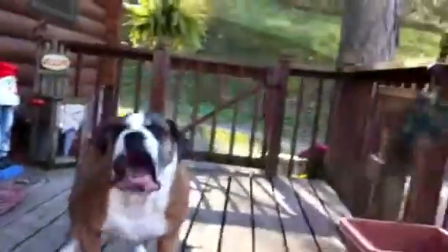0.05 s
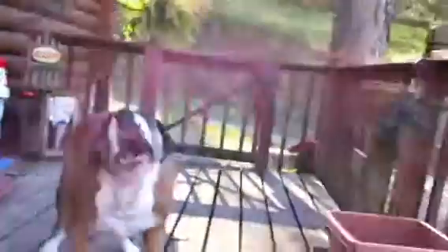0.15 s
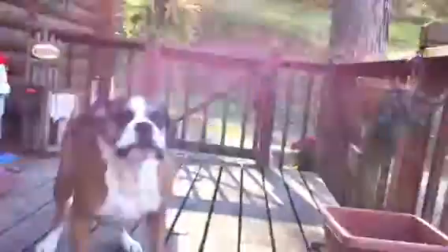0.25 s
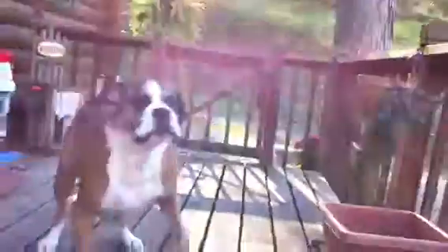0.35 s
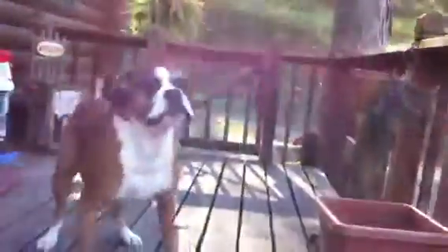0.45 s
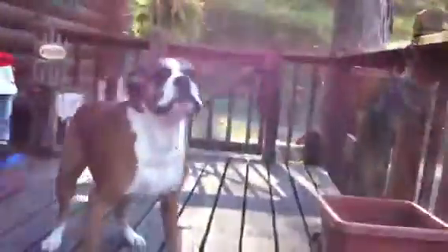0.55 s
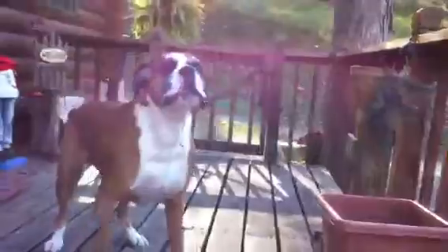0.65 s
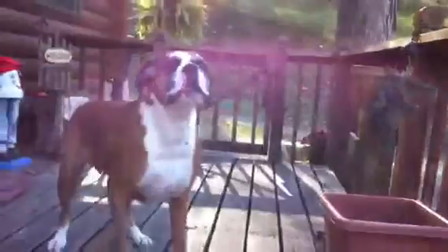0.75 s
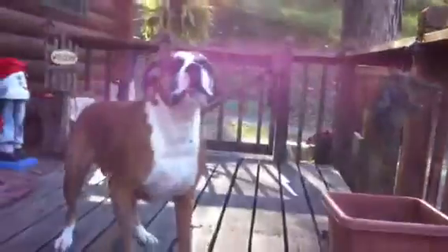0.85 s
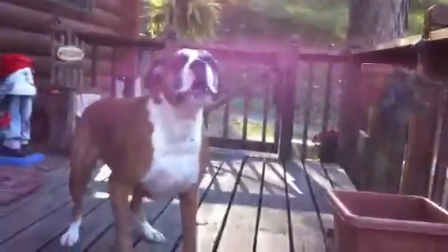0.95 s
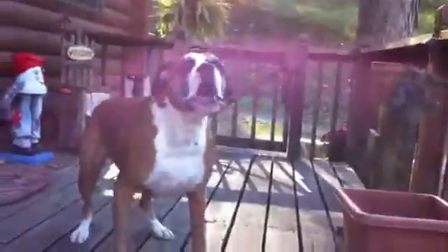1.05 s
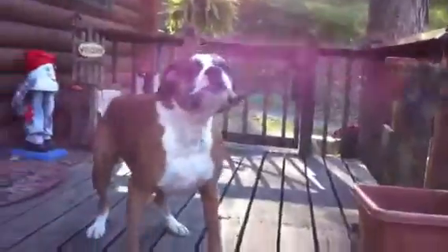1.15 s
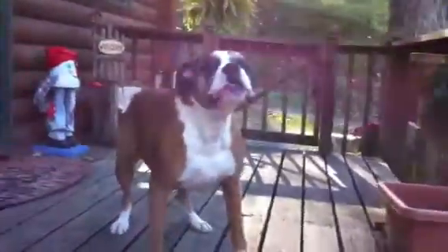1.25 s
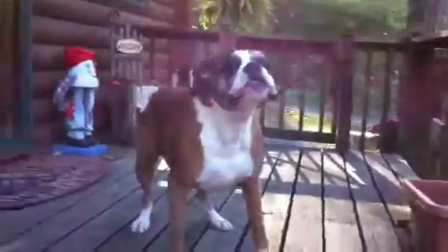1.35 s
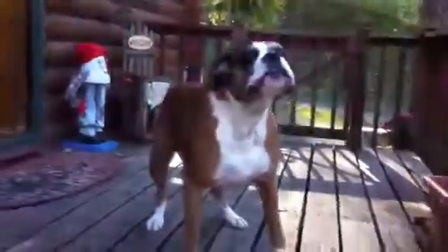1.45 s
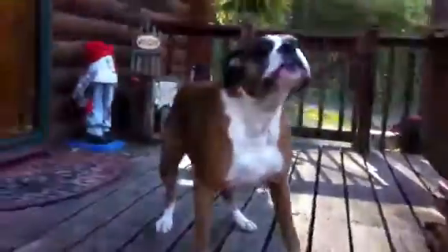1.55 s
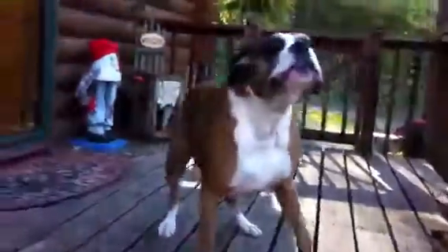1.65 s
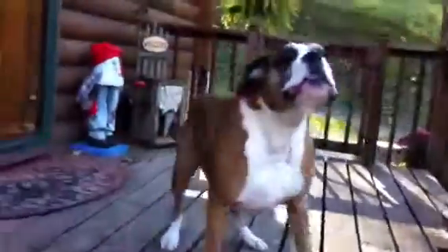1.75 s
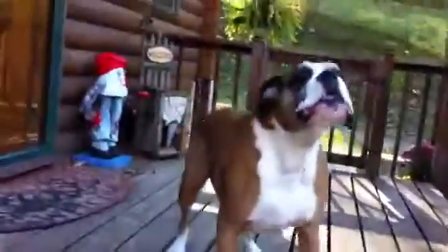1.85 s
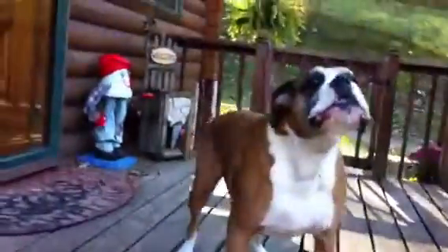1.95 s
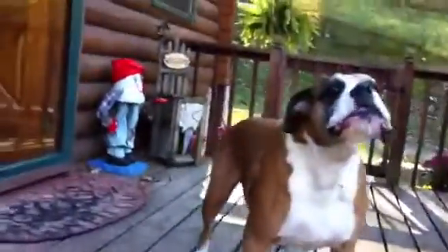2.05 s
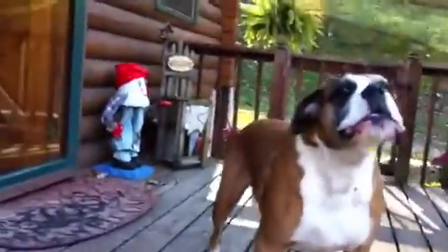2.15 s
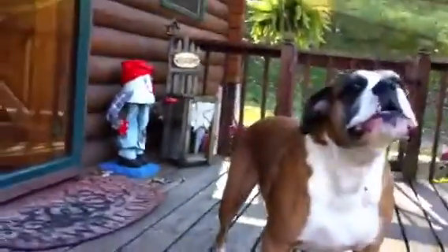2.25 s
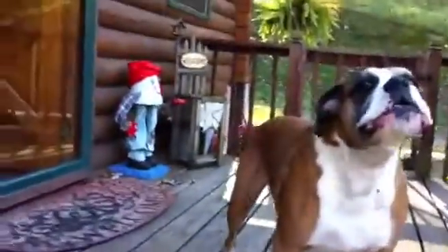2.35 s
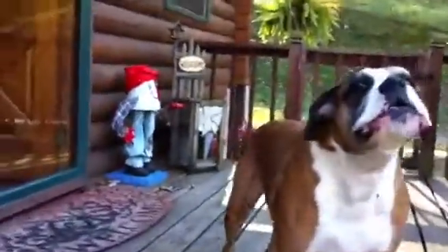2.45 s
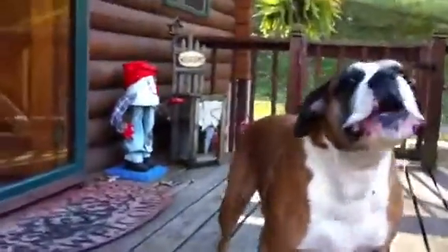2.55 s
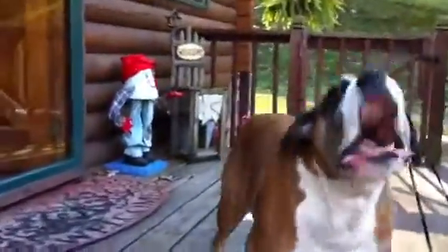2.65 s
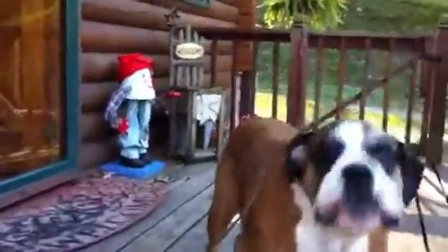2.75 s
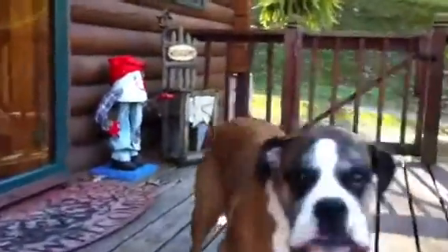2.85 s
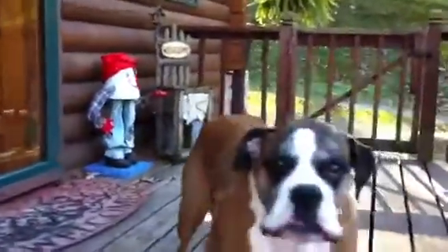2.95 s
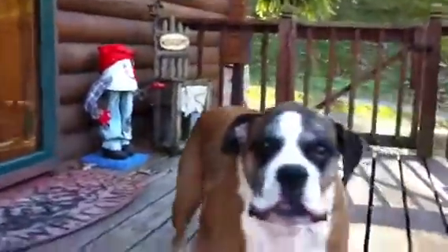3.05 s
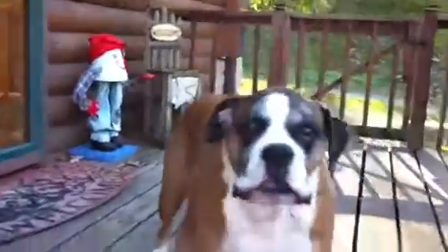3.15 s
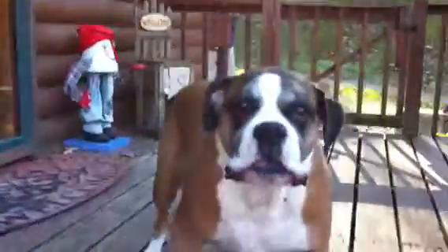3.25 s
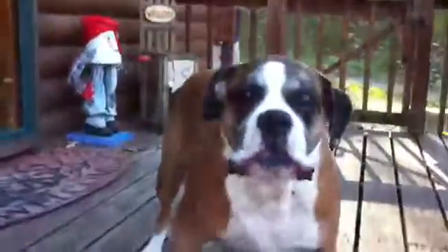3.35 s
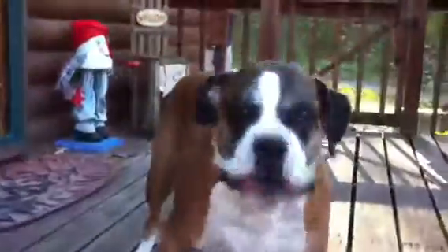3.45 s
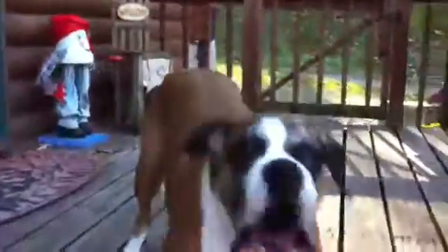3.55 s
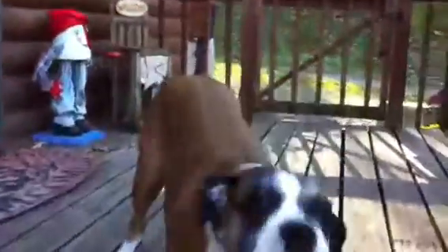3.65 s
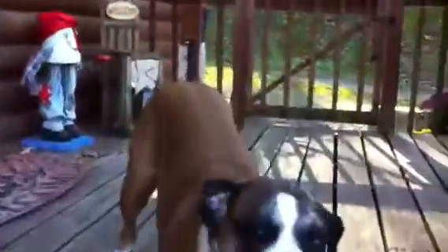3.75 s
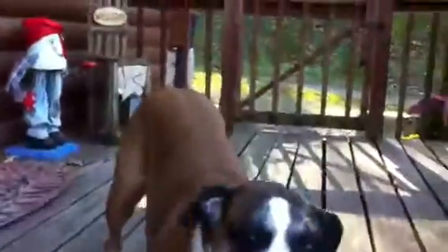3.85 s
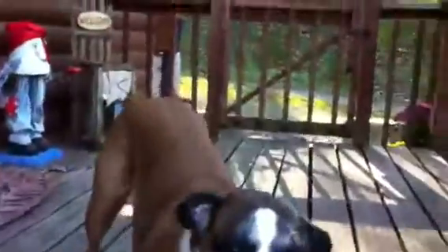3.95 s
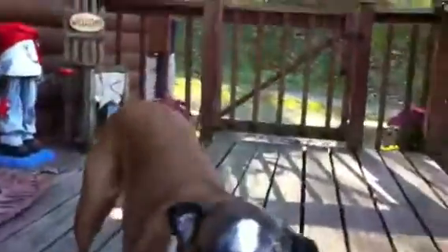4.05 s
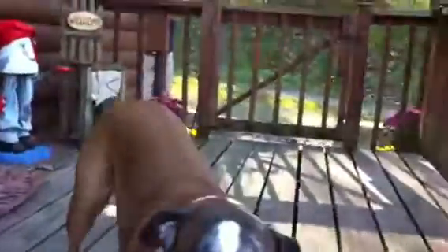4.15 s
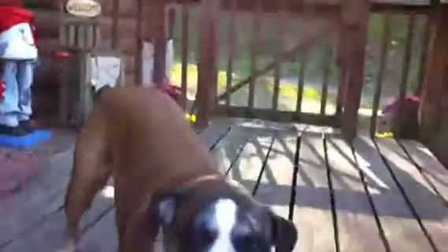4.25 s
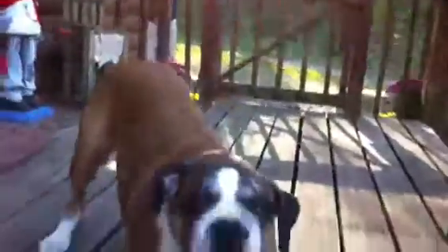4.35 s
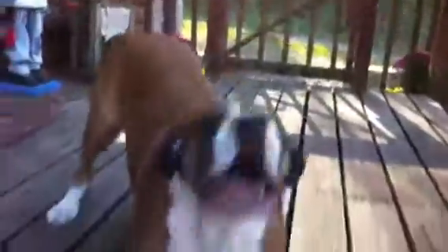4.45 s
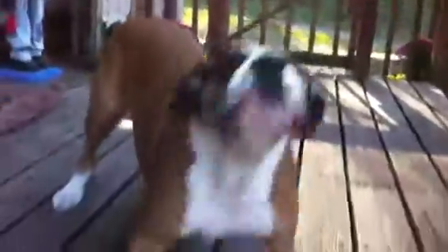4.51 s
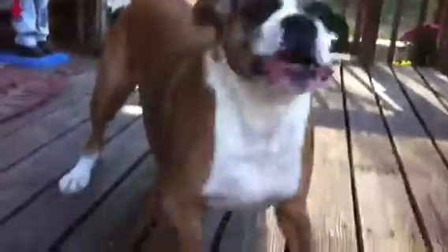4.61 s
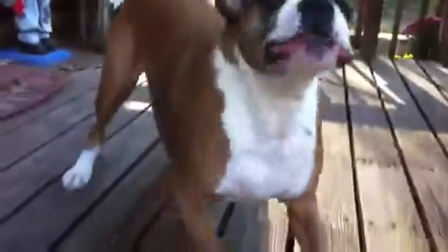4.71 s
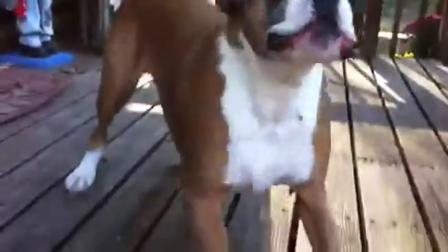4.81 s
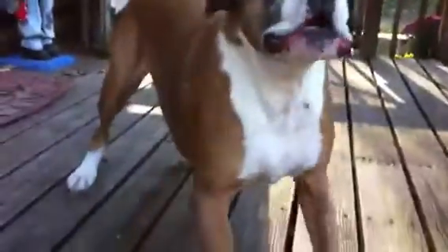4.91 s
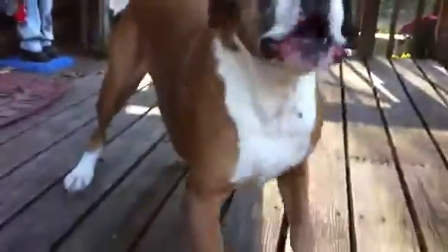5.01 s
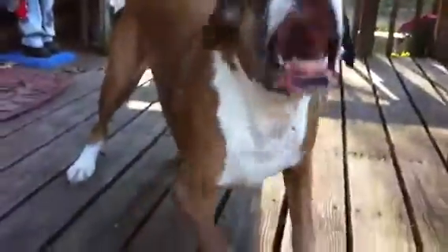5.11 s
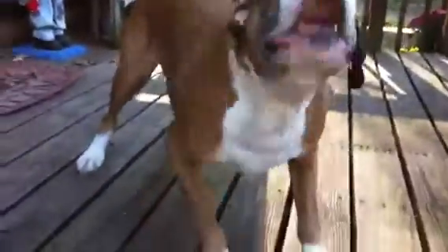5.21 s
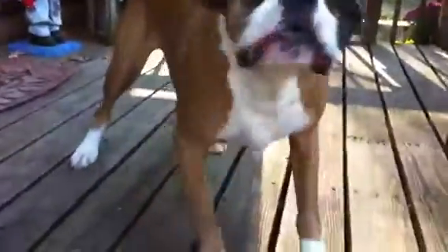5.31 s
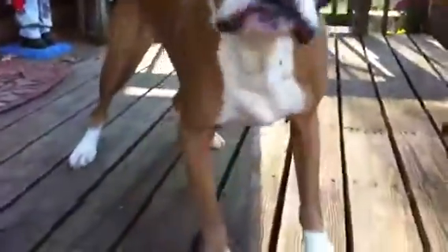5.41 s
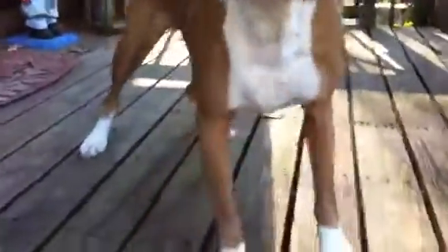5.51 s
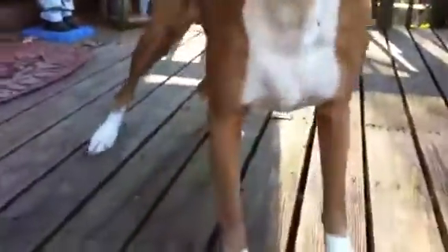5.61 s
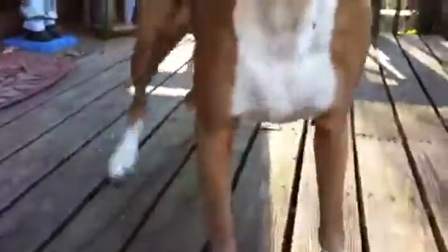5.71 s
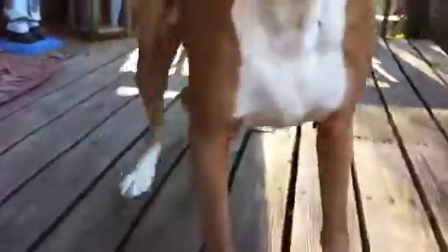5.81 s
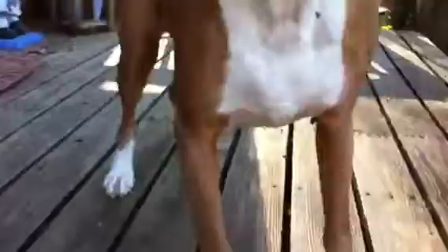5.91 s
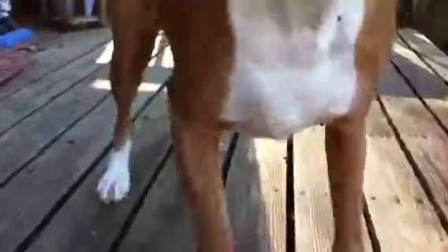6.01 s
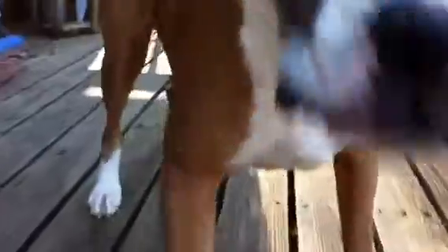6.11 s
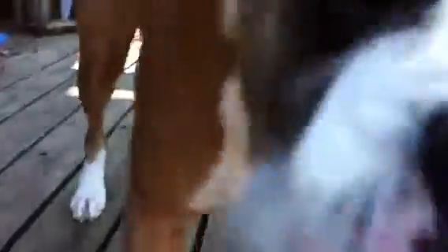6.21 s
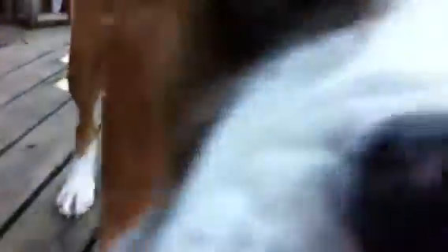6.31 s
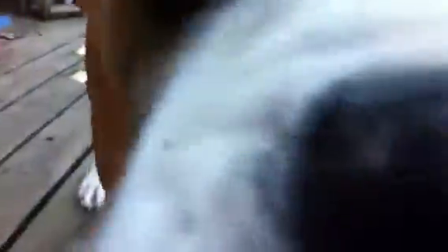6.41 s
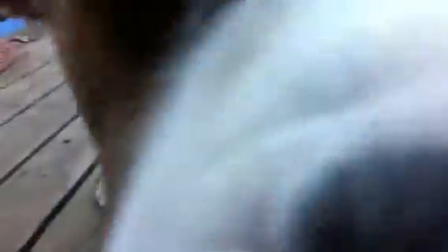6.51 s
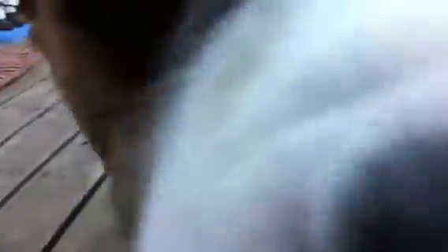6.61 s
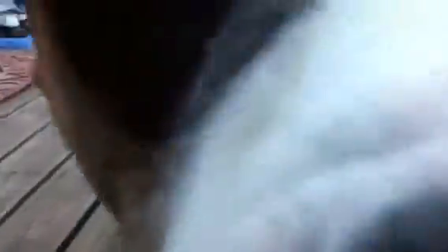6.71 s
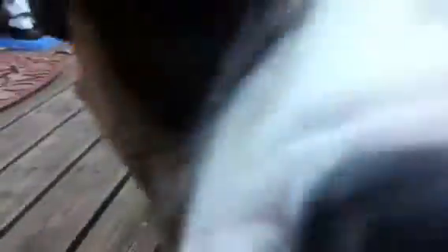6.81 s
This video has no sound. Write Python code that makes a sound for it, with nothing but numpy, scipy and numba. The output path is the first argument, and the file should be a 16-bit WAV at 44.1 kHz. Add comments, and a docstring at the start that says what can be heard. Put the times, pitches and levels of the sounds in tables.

```python
"""A short rattling growl, then five single barks: a dog on a wooden deck, a step from the microphone.
Vocal folds buzz through throat, mouth and teeth resonances. Each bark arches up and down in pitch
and breaks between clean and hoarse; the jaw moves the lowest throat resonance.
In between the dog pants with a low rumble, smacks its lips, clicks its claws and at last sniffs up close.
Faint outdoor air lies underneath."""
import sys
import numpy as np
from scipy import signal
from scipy.fft import rfft, irfft
from scipy.io import wavfile
from scipy.ndimage import uniform_filter1d, minimum_filter1d
from numba import njit

SR = 44100
rng = np.random.default_rng(int(sys.argv[2]) if len(sys.argv) > 2 else 0)


def transcribe(u):
    """Save the signal u as a 16-bit wav file named by the first command-line argument.

    u: samples, shape (n,) or (channels, n), limited to [-1, 1]; the rate is SR.
    q: integer samples, one column per channel.
    """
    v = np.clip(np.atleast_2d(u).T, -1, 1)
    q = np.round(v * 32767).astype(np.int16)
    wavfile.write(sys.argv[1], SR, q)


N = 302967
T = np.arange(N) / SR
TOP_HZ = 15950


def barks():
    """Five barks: bright, fast-jittering folds; the throat level dips where the voice breaks."""
    # start/s, pitch rise/s, pitch fall/s, crest f/Hz, attack/s, hold/s, mouth/dB, mouth sag/(dB/s),
    # hiss/dB, upper and lower throat resonance/Hz, opening and crest roughness/0-1, rasp re folds
    gestures = [(.205, .100, 0.078, 593, 0.025, 0.12, -29.5, 1, -35, 794, 605, 0.53, 0.6, 3),
                (2.689, 0.11, 0.11, 606.2, 0.055, 0.098, -20.5, 31, -32, 885, 509, .4, 0.6, .35),
                (3.632, 0.089, 0.12, 512.5, 0.034, 0.11, -25, 3.5, -31, 824, 576, 0.5, 0.67, 0.59),
                (4.506, 0.11, .080, 510, 0.031, 0.11, -17.5, 42, -30, 752, 756, 0.94, 0.03, 0.16),
                (5.243, .105, .078, 548.6, 0.0085, .124, -22, 65.5, -35.5, 790, 573, .7, .58, 1.1)]
    # throat level, one list per bark: t/s, level/dB
    throat_levels = [
        [(0.205, -45.5), (0.217, -23.5), (0.239, -5.5), (0.263, -26), (0.315, -9), (0.335, -31), (0.351, -16),
         (0.365, -36), (0.41, -48.5)],
        [(2.688, -40.5), (2.696, -32), (2.742, -7.5), (2.758, -19.5), (2.774, -6.5), (2.784, -20), (2.846, -4),
         (2.9, -48.5)],
        [(3.636, -39), (3.654, -19), (3.678, 0.5), (3.696, -22), (3.744, -9.5), (3.77, -27.5), (3.786, -14.5),
         (3.814, -43.5), (3.84, -52)],
        [(4.505, -12), (4.511, -39), (4.537, -11), (4.567, -10.5), (4.605, -24.5), (4.671, -22.5), (4.687, -80),
         (4.7, -53)],
        [(5.245, -31), (5.255, -15.5), (5.269, -8), (5.299, -16), (5.309, -30.5), (5.361, -11), (5.407, -38),
         (5.42, -50)],
    ]
    out = np.zeros(N)
    for (start_s, *shape, rasp), levels in zip(gestures, throat_levels):
        sound = voice(bark_controls(levels, start_s, *shape), rasp, jitter=.065, jitter_hz=380,
                      subharmonic=1.1, leak=1.1, tilt=.45, jaw_width_hz=200, low_hz=370, steady_s=.005)
        add(out, start_s, sound)
    return out


def bark_controls(levels, start_s, rise_s, fall_s, crest_hz, attack_s, hold_s, mouth_db, sag_db_per_s,
                  hiss_db, upper_hz, lower_hz, rough_open, rough_crest):
    """Pitch arches; harmonic 2 locks near the upper throat resonance, harmonic 1 near the lower."""
    rest_hz, jaw_shut_hz, release_s, tail_s = 295.8, 450, .026, .05
    lower_reach_hz, upper_reach_hz = 55.5, 85
    knots_s = np.cumsum([0, attack_s, hold_s, release_s, tail_s])
    t = T[:int(knots_s[-1] * SR)]
    throat_db = np.interp(start_s + t, *np.transpose(levels))
    effort_db = np.interp(t, knots_s, [-21, 0, 0, -20, -35])
    progress = np.interp(t, [0, rise_s, rise_s + fall_s], [0, 1, 2])
    arch = np.sin(np.pi / 2 * progress) ** 2
    hz = rest_hz + (crest_hz - rest_hz) * arch
    lower_lock = 1 / (1 + ((hz - lower_hz) / lower_reach_hz) ** 2)
    upper_lock = 1 / (1 + ((2 * hz - upper_hz) / upper_reach_hz) ** 2)
    register = lower_lock / (lower_lock + upper_lock)
    # the upper lock holds the pitch back and cleans the voice; between locks it breaks hoarse
    hz += .5 * upper_lock * (upper_hz / 2 - hz)
    rough = rough_open + (rough_crest - rough_open) * arch
    rough *= 1 - .55 * upper_lock + .15 * np.sin(np.pi * register) ** 2
    open_hz = upper_hz + (lower_hz - upper_hz) * register
    jaw_hz = jaw_shut_hz + (open_hz - jaw_shut_hz) * np.interp(t, knots_s, [.3, 1, 1, 0, 0])
    lock_lift_db = 4.5 * (np.maximum(upper_lock, lower_lock) - .5)
    mouth_rel_db = effort_db + mouth_db - sag_db_per_s * t + lock_lift_db - throat_db
    jowl_flap_db = 3 * wander(t, 83)
    hiss_rel_db = effort_db + hiss_db - 7.5 * (1 - np.minimum(progress, 1)) + jowl_flap_db - throat_db
    return start_s + t, hz, rough, jaw_hz, throat_db, mouth_rel_db, hiss_rel_db


def growl():
    """Slow, rough folds rattle; as the growl runs out, the pitch sags and the jaw closes."""
    # throat level: t/s, level/dB
    throat_levels = [(0.0, -15), (0.012, -14.5), (0.034, -20), (0.046, -21), (0.084, -29), (0.116, -43.5),
                     (0.137, -43.5)]
    s, db = np.transpose(throat_levels)
    hz, jaw_hz = 85.1 - 120 * s, 620 - 3400 * s
    rough, mouth_rel_db, hiss_rel_db = .97, -23, -28
    sound = voice((s, hz, rough, jaw_hz, db, mouth_rel_db, hiss_rel_db), rasp=2, jitter=.12,
                  jitter_hz=110, subharmonic=.25, leak=2.4, tilt=.8, jaw_width_hz=190, low_hz=120,
                  steady_s=.008)
    return np.pad(sound, (0, N - len(sound)))


def voice(controls, rasp, jitter, jitter_hz, subharmonic, leak, tilt, jaw_width_hz, low_hz, steady_s):
    """Folds buzz through jaw and mouth resonances; when rough they stumble and leak air."""
    # mouth resonances: f/Hz, width/Hz, relative level/dB
    mouth_modes = [(1144, 1000, -11.5), (1580, 66, -0.5), (1734, 27, -2), (2424, 620, -11.5)]
    # resonances of air rushing past teeth and lips: f/Hz, width/Hz, relative level/dB
    teeth_modes = [(3680, 390, -5.5), (4320, 57, 0.5), (4730, 120, 2), (5800, 76, 0.5), (6590, 140, -1.5),
                   (9270, 1700, -11), (11400, 1100, -17.5), (14700, 1200, -16.5)]
    s, *curves = np.broadcast_arrays(*controls)
    t = T[int(s[0] * SR):int((s[-1] + .02) * SR)]
    hz, rough, jaw_hz, db, mouth_rel_db, hiss_rel_db = (np.interp(t, s, c) for c in curves)
    rough = np.clip(rough, 0, 1)
    hz *= 1 + jitter * rough ** 1.7 * wander(t, jitter_hz)
    phase = 2 * np.pi * np.cumsum(hz) / SR
    k = np.arange(1, 31)[:, None]
    folds = unit(np.sum(np.cos(k * phase) * (k * hz < TOP_HZ) / k ** tilt, axis=0))
    # strong and weak cycles in turn put drifting lines between the harmonics
    alternation = subharmonic * rough * np.cos(phase / 2 + wander(t, 45))
    folds *= 1 + alternation + .45 * rough * wander(t, 300)
    air = rng.standard_normal(N)[:len(t)] * (1 + .9 * np.cos(phase))
    source = folds + leak * rough * air
    jaw = svf(svf(source, jaw_hz, float(jaw_width_hz)), jaw_hz, 4. * jaw_width_hz)
    throat = even(band(jaw, low_hz, 1150, order=4), steady_s)
    # turbulence in the mouth blurs the upper harmonics
    source += rasp * rng.standard_normal(N)[:len(t)] * (1 + .91 * np.cos(phase))
    mouth = even(band(soft_tissue(source, t, mouth_modes, 1), 1060, 2700, order=4), steady_s)
    lip_stretch = np.linspace(.93, 1.08, len(t))  # lips draw back, lifting the top resonances
    teeth = soft_tissue(source + .9 * air, t, teeth_modes, lip_stretch) + amp(-13) * air
    hiss = even(band(teeth, 3100, 14500, order=3), steady_s)
    # the blast of air pushes on the microphone
    puff = amp(-44.5 - .25 * db) * unit(band(rng.standard_normal(N), 20, 160, order=1))[:len(t)]
    sound = throat + amp(mouth_rel_db) * mouth + amp(hiss_rel_db) * hiss + puff
    fades = np.clip((t - t[0]) / .004, 0, 1) * np.clip((t[-1] - t) / .02, 0, 1)
    return sound * amp(db) * fades


def soft_tissue(x, t, modes, stretch):
    """Resonances sway in level and pitch as tongue and jowls flap."""
    out = np.zeros(len(t))
    for k, (hz, width_hz, db) in enumerate(modes):
        gain = (-1) ** k * amp(db + 3.5 * wander(t, 30))
        out += gain * svf(x, hz * (stretch + .025 * wander(t, 20)), float(width_hz))
    return out


def breath_events():
    """Breaths, then sniffs, in one table; a sniff is mostly hiss."""
    # breaths: start/s, length/s, relative level/dB, throat f/Hz, mouth f/Hz, mouth re throat/dB,
    # nose hiss/dB
    breaths = [(0.141, 0.093, -48, 730, 2090, -1, -49.5), (.38, .05, -63, 600, 2053, -12.5, -57),
               (0.519, 0.07, -42, 590, 1940, -2, -56), (.6, 0.14, -48, 520, 1830, -6.5, -60.5),
               (0.939, .07, -47, 602, 2068, 1.5, -61), (1.004, .11, -44, 888, 2394, -2.5, -60.5),
               (1.146, 0.19, -58.5, 590, 2354, -2, -83), (1.39, 0.083, -56, 520, 1905, -1.5, -65.5),
               (1.532, .14, -52.5, 520, 1700, -1, -55.5), (1.956, .22, -52.5, 530, 1910, 4.5, -56),
               (2.25, 0.24, -51.5, 480, 1786, -5, -60.5), (2.645, 0.065, -39.5, 470, 2090, -10.5, -57.5),
               (2.92, .21, -49.5, 520, 2145, -7.5, -58.5), (3.257, .1, -41.5, 920, 2250, -12, -76.5),
               (3.353, .14, -39.5, 848, 1950, -6, -64.5), (3.5, .14, -36.5, 740, 1900, -5, -59),
               (3.815, 0.15, -53.5, 596, 1834, -13, -54), (4.07, .11, -31.5, 621, 1930, -15, -51.5),
               (4.19, .12, -41.5, 550, 2232, -7.5, -67), (4.422, .03, -34.5, 520, 1785, -20.5, -59.5),
               (4.474, .04, -31, 533, 1810, -18.5, -46.5), (4.749, 0.093, -40.5, 693, 1803, -9, -51.5),
               (4.835, 0.13, -34, 619, 2055, -11, -52.5), (4.99, 0.18, -45, 932, 2080, -5.5, -57),
               (5.42, 0.18, -45, 600, 2110, -10, -56), (5.55, 0.22, -49.5, 723, 2180, -6, -72),
               (5.795, .05, -44.5, 430, 2017, -2.5, -52.5), (5.87, 0.19, -56, 500, 1807, 4.5, -60)]
    # close sniffs: start/s, length/s, nose hiss/dB
    sniffs = [(6.241, .18, -54.5), (6.472, 0.18, -46.5), (6.675, 0.15, -51)]
    return np.array(breaths + [(s, length_s, db - 5, 830, 1830, 2.5, db) for s, length_s, db in sniffs])


def panting():
    """Breath rings the throat and a pair of mouth resonances, which glide as the jaw moves."""
    s, length_s, db, *airway, _ = breath_events().T
    throat_hz, mouth_hz, mouth_db = (np.interp(T, s + length_s / 2, c) for c in airway)
    # the more closed the mouth, the deeper the soft palate rattles
    rattle = np.sin(2 * np.pi * np.cumsum(42 + 12 * wander(T, 30)) / SR)
    air = rng.standard_normal(N) * amp(2 * wander(T, 120) + .33 * mouth_db * rattle)
    throat = svf(svf(air, throat_hz, 130.), throat_hz, 420.)
    throat += .6 * amp(mouth_db) * svf(air, 1.42 * throat_hz, 200.)
    mouth_hz *= 1 + .06 * wander(T, 9)
    mouth = svf(air, .88 * mouth_hz, 240.) - svf(air, 1.12 * mouth_hz, 260.)
    rush = band(air, 650, 2200)
    upper = unit(unit(mouth) + amp(-1) * unit(rush))
    breath = (unit(throat) + amp(mouth_db) * upper) / np.hypot(1, amp(mouth_db))
    return breath * swells(zip(s, length_s, db - 3), idle_db=-70)


def nose():
    """The nose hisses with each breath and sniff; the nostrils whistle thinly."""
    # hiss spectrum: f/Hz, relative density/dB
    hiss_spectrum = [(1470, -19.5), (2500, -1), (3660, 0.5), (4170, -2.5), (4950, -0.5), (5780, -2),
                     (6450, -0.5), (7530, -5.5), (11500, -5.5), (15200, -14), (16000, -28)]
    nostril_modes = [(3320, 550, -6.5), (6350, 230, .5), (11700, 1700, -8.5)]
    s, length_s, *_, hiss_db = breath_events().T
    hiss = coloured(hiss_spectrum) * amp(1.8 * wander(T, 200) + 1.5 * wander(T, 35))
    whistle = resonate(rng.standard_normal(N), nostril_modes, stretch=1 + .049 * wander(T, 3))
    return (unit(hiss) + amp(-11) * unit(whistle)) * swells(zip(s, length_s, hiss_db), idle_db=-66)


def clicks():
    """Claws and lips: a faint scuff, then a sharp tick, a duller knock and an uneven scatter."""
    # claw clicks and lip smacks: t/s, tick level/dB, knock re tick/dB
    contacts = [(0.157, -42.5, 5), (0.6462, -39.5, -5), (1.0972, -33, -21), (1.139, -57, 2),
                (1.4492, -55, 14), (1.5287, -42, -31), (1.682, -45.5, 2), (1.8416, -57, 7.5),
                (1.952, -47.5, 0), (1.9649, -39, 0), (2.0188, -41.5, 0), (2.392, -43, -1),
                (2.4264, -39.5, -1.5), (2.5848, -46, -3), (3.0704, -38.5, -3.5), (3.315, -43, -21),
                (3.461, -36, -7), (3.921, -39.5, -4), (4.0587, -45, -21), (4.1132, -37.5, 1.5),
                (4.2216, -35.5, -32.5), (4.468, -37, -20), (4.7759, -39.5, -3), (4.8606, -32.5, -23),
                (4.949, -34.5, -25), (5.1585, -42, -22), (5.7028, -45, -3), (5.9482, -39, -1)]
    scuff_s, click_decay_s, scatter_decay_s = .004, .0045, .023
    out, t = np.zeros(N), T[:4000]
    after_s = np.maximum(t - scuff_s, 0)
    for s, db, knock_db in contacts:
        tick = unit(band(rng.standard_normal(len(t)), 2900, 6700, order=1))
        knock = unit(band(rng.standard_normal(len(t)), 500, 3100))
        scatter = amp(-19 + 3 * wander(t, 400)) * np.exp(-after_s / scatter_decay_s)
        strike = np.exp(-after_s / click_decay_s) * (t >= scuff_s)
        envelope = strike + scatter * np.minimum(t / scuff_s, 1)
        add(out, s - scuff_s, amp(db) * envelope * (tick + amp(knock_db) * knock))
    return out


def soft_knocks():
    """Soft, briefly ringing knocks over a low boom: throat pulses, lip smacks and paw steps."""
    # soft knocks: t/s, relative peak/dB, ring f/Hz
    knocks = [(0.87, -52.5, 475), (1.098, -43, 390), (1.14, -38.5, 420), (1.966, -49, 549),
              (3.92, -42.5, 875), (4.058, -37, 600), (4.276, -39.5, 543), (4.415, -54, 520),
              (4.465, -55, 483), (4.844, -34.5, 700), (5.035, -43, 810), (5.807, -45, 367),
              (6.338, -53, 1183)]
    out, t = np.zeros(N), T[:6000]
    for s, db, hz in knocks:
        push = band(rng.standard_normal(len(t)) * np.exp(-t / .007), 120, 1100)
        ring = resonate(push, [(hz, 70, 0), (170, 45, -9), (1050, 300, -15)])
        add(out, s, amp(db + 9.5) * ring / np.abs(ring).max())
    return out


def breath_rumble():
    """Low rumble that swells with the dog's breaths."""
    # breath rumble spectrum: f/Hz, relative density/dB
    rumble_spectrum = [(18, -67), (30, -31.5), (81, -25), (129, -1.5), (253, 0), (316, -4.5), (444, -3.5),
                       (500, -3.5), (650, -16), (1100, -120)]
    # low breath swells: start/s, length/s, level/dB
    low_swells = [(.1, 0.067, -55), (.55, 0.13, -50.5), (.93, 0.27, -52.5), (1.36, 0.12, -52.5),
                  (1.97, 0.11, -53), (2.29, 0.29, -53), (2.62, .09, -50), (3.05, .08, -56),
                  (3.33, .31, -50), (4.05, .27, -48), (4.42, .1, -46), (4.73, 0.27, -47.5),
                  (5.05, 0.35, -51), (5.44, 0.042, -61), (5.57, 0.18, -51), (5.9, .17, -59.5),
                  (6.3, 0.14, -60.5), (6.55, 0.15, -57)]
    rumble = coloured(rumble_spectrum) * amp(2.8 * wander(T, 35))
    return unit(rumble) * swells(low_swells, idle_db=-64.5)


def deck(x, early_db, early_decay_s, tail_db, tail_t60_s):
    """Boards and log wall answer quickly; the yard adds a faint, dull tail."""
    t = T[:SR // 2]
    near, far = rng.standard_normal((2, len(t)))
    early = band(near, 200, 7300, order=1) * np.exp(-t / early_decay_s) * (t > .005)
    tail = band(far, 300, 3500, order=1) * amp(-60 * t / tail_t60_s) * (t > .025)
    echo = (amp(early_db) * unit(early) + amp(tail_db) * unit(tail)) / np.sqrt(len(t))
    return x + signal.fftconvolve(x, echo)[:N]


def outdoor_air():
    """Still air: faint noise that wavers in level."""
    # air spectrum: f/Hz, relative density/dB
    air_spectrum = [(30, -25.5), (80, -16), (140, -6.5), (400, -6), (1200, 17.5), (3000, -17), (12000, -21),
                    (16000, -42)]
    return amp(-67) * coloured(air_spectrum) * amp(1.5 * wander(T, 7.5))


def swells(events, idle_db):
    """Gain curve: a rounded swell per (start/s, length/s, level/dB) over an idle level."""
    lead_s, fade_s, roundness = .017, .036, .38
    power = np.full(N, amp(idle_db) ** 2)
    for s, length_s, db in events:
        arch = np.sin(np.linspace(0, np.pi, int((lead_s + length_s + fade_s) * SR)))
        add(power, s - lead_s, (amp(db) * np.abs(arch) ** roundness) ** 2)
    return np.sqrt(power)


def amp(db):
    """Decibels to gain."""
    return 10 ** (np.asarray(db) / 20)


def unit(x):
    """Scale to rms 1."""
    return x / np.sqrt(np.mean(x ** 2) + 1e-20)


def even(x, span_s):
    """Hold the rms near 1 over span_s, leaving faster flutter alone."""
    size = max(int(span_s * SR), 2)
    power = uniform_filter1d(uniform_filter1d(x ** 2, size), size)
    return x / np.sqrt(np.abs(power) + 1e-14)


def band(x, low_hz, high_hz, order=2):
    """Butterworth band-pass."""
    return signal.sosfilt(signal.butter(order, [low_hz, high_hz], "band", fs=SR, output="sos"), x)


@njit
def svf(x, hz, width_hz):
    """Resonance with a moving centre, gain 1 at the peak."""
    y, band_state, low_state = np.empty(len(x)), 0., 0.
    for i in range(len(x)):
        g, damping = np.tan(np.pi * hz[i] / SR), width_hz / hz[i]
        v = (band_state + g * (x[i] - low_state)) / (1 + g * (g + damping))
        band_state = 2 * v - band_state
        low_state += 2 * g * v
        y[i] = damping * v
    return y


def resonate(x, modes, stretch=1):
    """Parallel resonances (f/Hz, width/Hz, level/dB), each f scaled by stretch."""
    return sum((-1) ** k * amp(db) * svf(x, hz * stretch * np.ones(len(x)), float(width_hz))
               for k, (hz, width_hz, db) in enumerate(modes))


def wander(t, rate_hz):
    """Random values joined by lines, rate_hz of them a second."""
    return np.interp((t - t[0]) * rate_hz, np.arange(4096), rng.standard_normal(4096))


def coloured(points):
    """Noise of rms 1 with a (f/Hz, level/dB) spectrum."""
    hz, db = np.transpose(points)
    bins_hz = np.maximum(np.arange(N // 2 + 1) * SR / N, 1)
    gain = amp(np.interp(np.log(bins_hz), np.log(hz), db))
    return unit(irfft(rfft(rng.standard_normal(N)) * gain, N))


def add(out, start_s, x):
    """Mix x into out from start_s on."""
    i = max(int(start_s * SR), 0)
    out[i:i + len(x)] += x[:N - i]


def scene():
    """The dog on the deck, over still outdoor air; mono."""
    direct = growl() + barks() + clicks() + soft_knocks()
    echoing = deck(direct, early_db=-16, early_decay_s=.01, tail_db=-38, tail_t60_s=.4)
    return (echoing + outdoor_air() + panting() + breath_rumble() + nose())[None]


def record(dry):
    """A fast limiter holds the loudest peaks down; a steep low-pass cuts the top."""
    ceiling, size = .715, int(.005 * SR)
    gain = ceiling / np.maximum(np.abs(dry), ceiling)
    gain = uniform_filter1d(minimum_filter1d(gain, size), size)
    return signal.sosfilt(signal.ellip(8, .2, 70, TOP_HZ, fs=SR, output="sos"), dry * gain)


dry = scene()
out = record(dry)
transcribe(out)
```